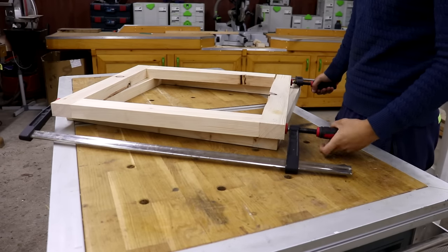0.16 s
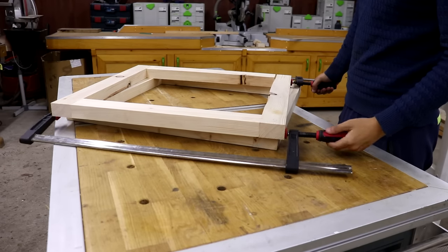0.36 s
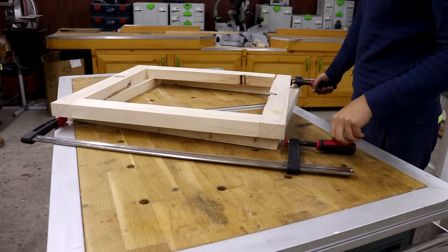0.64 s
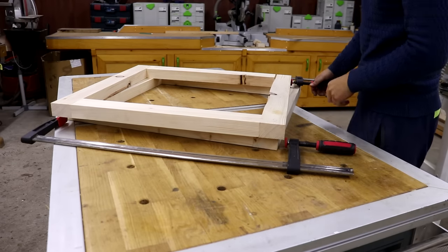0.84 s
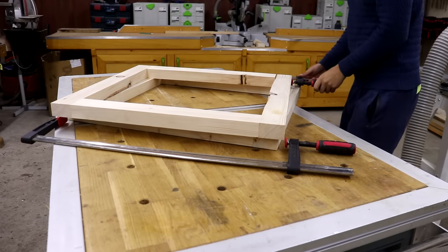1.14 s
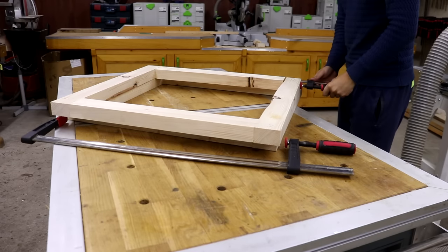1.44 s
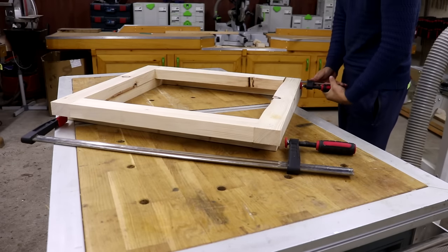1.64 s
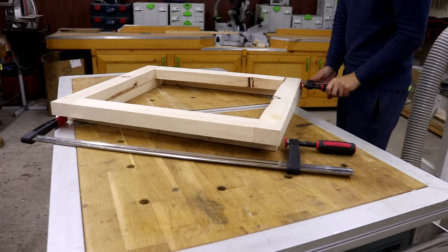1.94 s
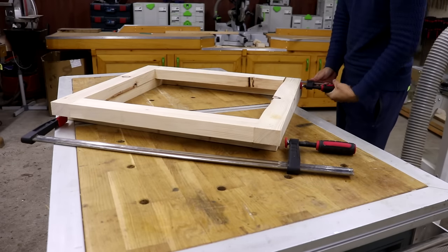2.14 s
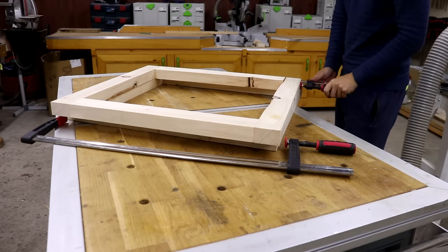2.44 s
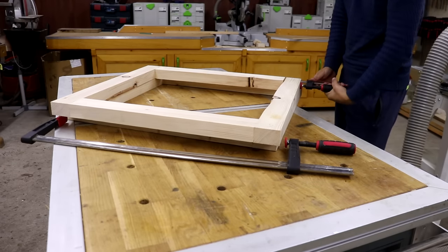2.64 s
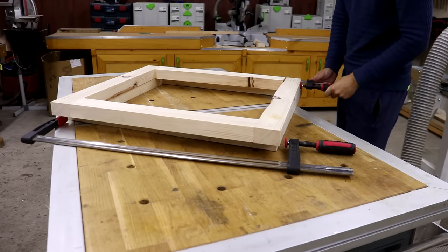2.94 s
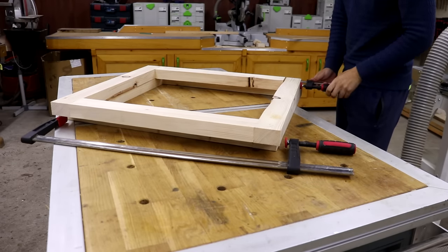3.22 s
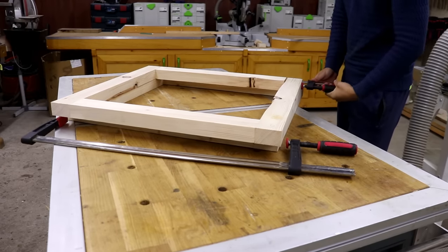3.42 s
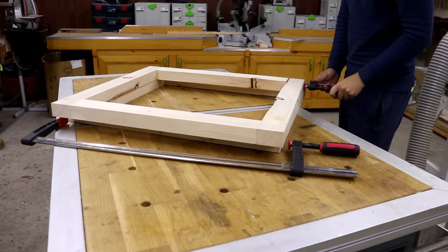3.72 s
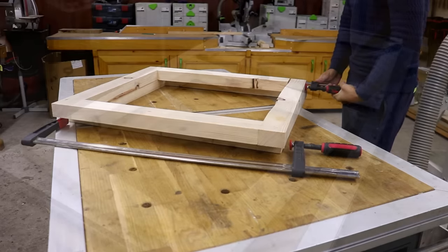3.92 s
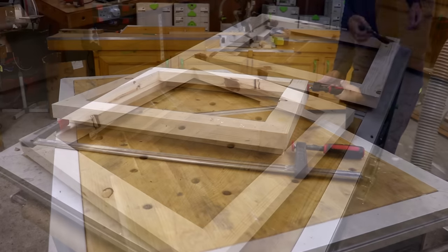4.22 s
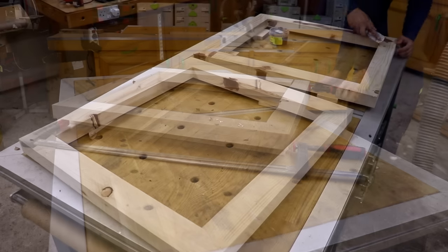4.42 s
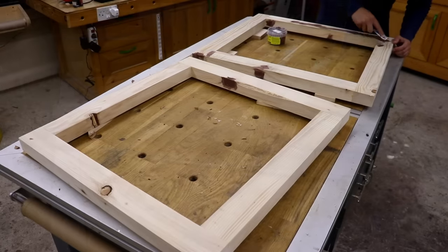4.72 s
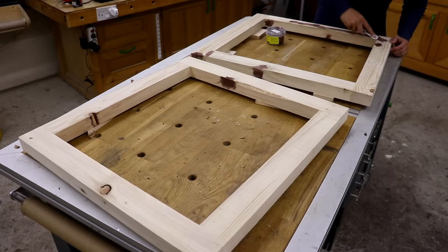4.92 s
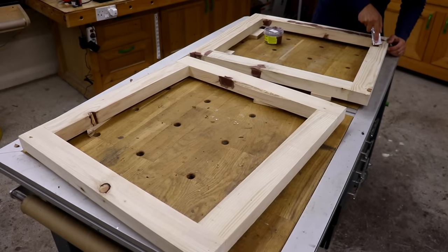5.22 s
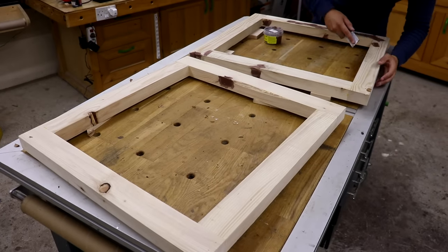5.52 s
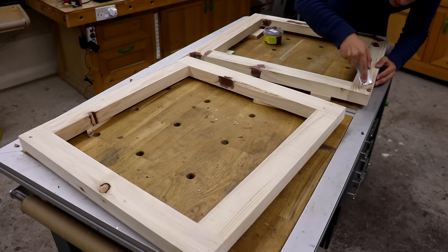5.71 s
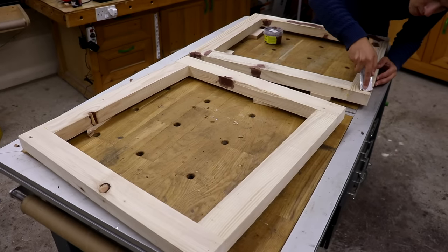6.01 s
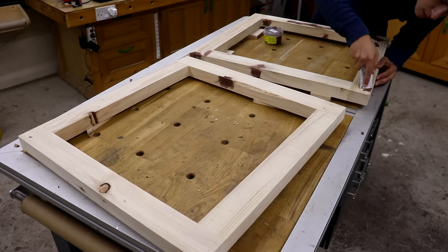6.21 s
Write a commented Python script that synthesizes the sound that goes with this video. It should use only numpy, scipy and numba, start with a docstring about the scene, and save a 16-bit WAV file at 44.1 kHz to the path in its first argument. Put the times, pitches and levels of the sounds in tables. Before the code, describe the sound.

Heavy metal clatter on a bench, six spaced knocks of a wooden frame as a clamp is screwed tight, then tiny scrapes and ticks on wood.

```python
"""A steel bar clamp lands on a workbench and rattles: noise cracks, ringing sine waves and a room tail.
Then a second clamp is screwed tight on a wooden frame. The frame knocks at every turn of the handle, as
damped sines and noise; hand, sleeve and screw rub in between, as streams of tiny slips.
At the end a small blade taps and scrapes on the wood. Hum, rumble and hiss lie under it all.
The close microphone overloads on the loud blows, and its gain control holds their ring level."""
import sys
import numpy as np
from scipy import signal
from scipy.fft import rfft, irfft, next_fast_len
from scipy.io import wavfile
from numba import njit

SR = 44100
rng = np.random.default_rng(int(sys.argv[2]) if len(sys.argv) > 2 else 0)


def to_wav(sig):
    """Store sig (one row per channel, or 1-D mono) as 16-bit WAV at the path in sys.argv[1].

    Samples outside -1..1 are clipped; the rate is SR.
    """
    pcm = np.clip(np.atleast_2d(sig), -1, 1) * 32767
    pcm = np.round(pcm).astype(np.int16)
    wavfile.write(sys.argv[1], SR, pcm.T)  # frames by channels


N = 280476
TIME = np.arange(N) / SR
RING = TIME[:SR * 4 // 5]   # clock of one single sound, 0.8 s long

# half turns of the screw, each a fresh grip and then a jerk of the frame:
# jerk t/s, jerk level/dB, grip t/s, grip length/s, grip level/dB, sleeve level/dB
TURNS = [(2.503, -19.5, 2.314, .04, -45, -69), (2.9436, -19, 2.752, 0.069, -45.5, -56.5),
         (3.3780, -17, 3.2, 0.057, -41.5, -63.5), (3.7872, -24, 3.598, .045, -47.5, -75),
         (4.205, -25, 4.056, 0.034, -44, -84), (4.579, -32, 4.4, 0.04, -52.5, -84)]
# light clicks of steel on steel or wood: t/s, level/dB, body level/dB, hiss level/dB
CLICKS = [(1.109, -53, -3, -57), (1.686, -48, -2.5, -63), (2.221, -45, -8, -47), (3.0703, -45, -6, -56.5),
          (3.904, -51.5, -12, -61), (4.219, -48.5, 7, -65), (5.201, -51.5, -13, -79),
          (5.434, -54, -27, -60.5), (5.7328, -62, 0, -76.5)]
# the blade is set down, then drawn over the wood:
# t/s, tap level/dB, body of the tap/dB, length of the draw/s, draw level/dB
BLADE_STROKES = [(4.678, -49.5, 1, .06, -70.5), (4.957, -55.5, -7.5, .05, -62.5),
                 (5.0816, -63, 1, .11, -65.5), (5.3045, -55, 6.5, 0.06, -58), (5.839, -60.5, 6, 0.11, -58),
                 (6.0463, -50.5, 5, 0.091, -55.5), (6.2417, -51, 2.5, .038, -49)]
# tone of a bright edge contact: f/Hz, level/dB
EDGE = [(1500, -6), (3300, 9.5), (6000, 9.5), (9000, 8), (12500, 9.5), (15500, -3.5)]
# tone of the body under a click or under the blade: f/Hz, level/dB
BLADE_BODY = [(200, -12.5), (400, 2.5), (850, 0), (1050, -3.5), (1280, -1.5), (1550, -2), (2100, 0.5),
              (2600, -9), (4300, -7), (7000, -16)]


def clamp(tail_db=-9, tail_hz=9000, bar_db=-12, tilt_db_per_octave=2.0, crack_t60=0.054, bar_t60=0.37,
          treble_hz=4000, lowest_hz=130):
    """Each blow is a crack, the ring of the bar and the answer of bench and room; steel on steel is brighter."""
    # tone of struck steel: f/Hz, level/dB
    steel = [(100, -35), (200, -6), (600, 0), (900, -7), (1080, -0.5), (1700, 2.5), (2550, -11),
             (3200, -18.5), (5300, -18), (8300, -22), (10000, -18), (11400, -20), (13000, -28.5),
             (16000, -29)]
    # ringing tones of the steel bar, before the tilt: f/Hz, level/dB
    bar_modes = [(1047, -48), (1319, -49), (1504, -48), (1640, -46), (1783, -45), (2225, -50), (2331, -50),
                 (2568, -51), (2627, -52), (3806, -60), (4700, -60), (5076, -60), (5561, -60), (5626, -60),
                 (5873, -59), (6142, -67), (6428, -63), (6740, -61), (7817, -61), (8818, -62), (9851, -64),
                 (10374, -64), (12312, -75), (14850, -78)]
    tilted = [(hz, db + tilt_db_per_octave * np.log2(hz)) for hz, db in bar_modes]
    out = np.zeros(N)
    for s, db, treble_db, ring_db in blows():
        crack = noise(steel) * dying(crack_t60)
        answer = from_db(tail_db) * soften(room_tail(noise(steel)), tail_hz)
        bar = from_db(bar_db + ring_db) * ringing(tilted, bar_t60, detune=.002)
        blow = crack + answer + bar
        dull = signal.lfilter(*signal.butter(1, treble_hz, fs=SR), blow)
        treble = blow - dull
        add(out, s, from_db(db) * (dull + from_db(treble_db) * treble))
    return low_cut(out, lowest_hz)


def blows(edge_lead_s=0.0018, edge_db=-2.5):
    """Every clank is a double contact, one edge just before the rest: (t/s, level/dB, treble/dB, ring/dB)."""
    # steel clamp striking the bench: t/s, level/dB, treble level/dB, ring of the bar/dB
    clanks = [(0.3839, 9, 1.5, -4), (0.6631, -10, 5, -8.5), (0.67, -3, 2.5, -3), (0.7286, -16, 9, -7.5),
              (1.3155, -8.5, -11, -17.5)]
    for s, db, treble_db, ring_db in clanks:
        yield s - edge_lead_s, db + edge_db, treble_db, ring_db
        yield s, db, treble_db, ring_db


def frame(tail_db=-9, modes_db=-6, grit_db=-7, grit_t60=0.059, wood_t60=0.27, lead_db=-9,
          bend_lag_s=0.001678, lowest_hz=165):
    """Every knock rings the same wood; a thin snap runs ahead of the slower bending wave."""
    # ringing tones of the clamped frame: f/Hz, level/dB
    frame_modes = [(214.5, -52), (306.8, -50), (398, -44), (452.2, -47), (511.4, -49), (619.1, -47),
                   (667.5, -51), (732.1, -47), (829.0, -53), (855.9, -54), (1157, -55), (1244, -56),
                   (1400, -56), (1443, -54), (1486, -56), (1545, -60), (1660, -57), (1733, -59),
                   (1820, -55), (1992, -64)]
    # tone of the noise in a knock and of its room tail: f/Hz, level/dB
    wood_tail = [(130, -12.5), (200, -1), (400, -3), (750, -4.5), (950, -7), (1800, -9), (2100, -17),
                 (3200, -25.5), (9000, -40.5)]
    out = np.zeros(N)
    for s, db, hard_hz in knocks():
        crack = wood_crack()
        grit = from_db(grit_db) * noise(wood_tail) * dying(grit_t60)
        modes = from_db(modes_db) * ringing(frame_modes, wood_t60)
        echo = from_db(tail_db) * room_tail(noise(wood_tail))
        add(out, s, from_db(db + lead_db) * soften(crack, hard_hz))
        add(out, s + bend_lag_s, from_db(db) * soften(crack + grit + modes + echo, hard_hz))
    return low_cut(out, lowest_hz)


def knocks(bounce_loss_db=5):
    """Single or bouncing knocks, and the play, slip and jerk of each turn: (t/s, level/dB, hardness/Hz)."""
    # knocks of frame, bench and blade, single or with dying bounces:
    # t/s, level/dB, hardness f/Hz, time between bounces/s, number of contacts
    plain_knocks = [(0.372, -27.5, 799, .04, 1), (.555, -19, 397, 0.056, 2), (0.6329, -20.5, 4000, 0.02, 2),
                    (0.763, -18.5, 3580, 0.032, 2), (1.181, -42, 1230, .04, 1), (1.316, -15, 3200, .034, 3),
                    (1.782, -31.5, 1530, .064, 2), (2.646, -38.5, 900, .1, 1), (2.68, -38, 1497, 0.092, 2),
                    (4.81, -52, 1006, 0.13, 2), (5.150, -52, 1100, .05, 1)]
    for s, db, hard_hz, gap, count in plain_knocks:
        for k in range(round(count)):
            yield s + k * gap, db - k * bounce_loss_db, hard_hz
    for s, db, grip_s, length, grip_db, _ in TURNS:
        force_db = db + 21   # strength against a -21 dB jerk
        # the handle takes up its play partway into the grip
        yield grip_s + 0.44 * length, grip_db - 0.5, 1950
        # the screw slips softly just before it gives
        yield s - .021, force_db - 40, 636
        # a stronger jerk is a harder contact: one octave brighter for every 17 dB
        yield s, db, 4350 * 2 ** (force_db / 17)


def wood_crack(spread_db=2.5):
    """The quickly damped resonances of wood, balanced a little differently by every contact."""
    # broad resonances of a knock: f/Hz, level/dB, time to fall by 60 dB/s
    resonances = [(482, -13, 0.033), (755, -5.5, 0.082), (1090, -4.5, 0.0049), (1554, 1, 0.013),
                  (1845, -6.5, 0.04), (2365, -11.5, 0.0084), (2870, -13, 0.013), (4520, -11, 0.0064)]
    chance_db = spread_db * rng.standard_normal(len(resonances))
    crack = np.zeros(len(RING))
    for k, (hz, db, t60) in enumerate(resonances):
        sign = (-1) ** k
        crack += sign * from_db(db + chance_db[k]) * np.sin(2 * np.pi * hz * RING) * dying(t60)
    return crack


def ticks(click_t60=0.012, tail_db=-9, tail_t60=0.44, note_db=-3, note_t60=0.13, lowest_hz=220):
    """A bright edge click over the short note of what it touches."""
    # ringing tones of lightly tapped wood: f/Hz, level/dB
    tap_modes = [(850.6, -69.5), (1276, -66.5), (1453, -81.5), (1863, -68), (2148, -69), (2842, -70),
                 (3763, -71.5), (4393, -71)]
    out = np.zeros(N)
    for s, db, body_db, *_ in CLICKS + BLADE_STROKES:
        contact = noise(EDGE) + from_db(body_db) * noise(BLADE_BODY)
        fade = dying(click_t60) + from_db(tail_db) * dying(tail_t60)
        note = from_db(body_db + note_db) * ringing(tap_modes, note_t60)
        add(out, s, from_db(db) * (contact * fade + note))
    return low_cut(out, lowest_hz)


def rubbing(wet_db=-2):
    """All sounds made of tiny slips, from screw, hand, sleeve and blade, with the room behind them."""
    close = skids_thump_and_creaks() + screw_grinding() + soft_brushing() + blade_drawing()
    room = room_tail(rng.standard_normal(len(RING)))
    wet = from_db(wet_db)
    return (close + wet * resound(close, room)) / np.hypot(1, wet)


def skids_thump_and_creaks(skirt_db=-15, creak_s=0.031, creak_db=-14.5, creak_hz=2520):
    """Sparse slips around one resonance: skids, one low thump, and a creak of the thread at each grip."""
    # skids, and one low thump of the frame at 1.18 s: t/s, length/s, level/dB, resonance f/Hz
    skids_and_thump = [(0.63, .02, -34, 1344), (.756, 0.032, -20, 1050), (1.18, 0.028, -33.5, 222),
                       (1.229, 0.085, -39, 1950), (1.264, 0.15, -29.5, 830), (5.588, 0.024, -57.5, 2620)]
    creaks = [(s, creak_s, db + creak_db, creak_hz) for _, _, s, _, db, _ in TURNS]
    out = np.zeros(N)
    for s, length, db, hz in skids_and_thump + creaks:
        add(out, s, from_db(db) * stroke(length, hump(hz, skirt_db), slips_per_s=1300, grain_db=2.0))
    return out


def screw_grinding(screw_db=-8.5, screw_t60=.035):
    """The thread grinds in tiny slips, and these make the screw ring."""
    # the screw spun loosely before it bites: t/s, length/s, level/dB
    spins = [(0.072, 0.14, -46.5), (0.308, 0.2, -40), (1.832, 0.054, -43.5), (2.376, 0.047, -46)]
    # tone of the grinding thread: f/Hz, level/dB
    grind_tone = [(150, -6), (260, 9.5), (450, -7), (1000, -4.5), (1700, -13), (2300, -10.5), (3000, -14),
                  (4000, -19.5), (7000, -20)]
    # ringing tones of the screw: f/Hz, level/dB
    screw_modes = [(969, -3), (1670, 1), (2560, 0), (2850, -1), (3630, -4.5), (4980, -6.5), (7100, -4.5)]
    grips = [(s, length, db) for _, _, s, length, db, _ in TURNS]
    out = np.zeros(N)
    for s, length, db in spins + grips:
        grind = from_db(db) * stroke(length, grind_tone, slips_per_s=2300, grain_db=1.5)
        ring = from_db(screw_db) * resound(grind, ringing(screw_modes, screw_t60))
        add(out, s, grind + ring)
    return out


def soft_brushing(skirt_db=-22):
    """A dense stream of slips makes soft brushing, one bright click, the sleeve and the hiss of each tick."""
    # soft brushing, and one short bright click at 0.54 s: t/s, length/s, level/dB, centre f/Hz
    brushes_and_click = [(0.011, 0.31, -59.5, 8300), (0.5406, 0.0052, -22.5, 6190),
                         (0.981, 0.052, -49, 5430), (1.095, 0.13, -54.5, 4590), (1.224, 0.11, -47, 8000),
                         (1.4, 0.27, -55, 8740)]
    # the sleeve follows the arm round, a little after the grip
    sleeves = [(s + 0.053, 0.24, db, 8160) for _, _, s, _, _, db in TURNS]
    # each light click glances off with a short hiss
    glances = [(s, 0.04, db, 8500) for s, _, _, db in CLICKS]
    out = np.zeros(N)
    for s, length, db, hz in brushes_and_click + sleeves + glances:
        add(out, s, from_db(db) * stroke(length, hump(hz, skirt_db), slips_per_s=15000, grain_db=1))
    return out


def blade_drawing(wait=0.25, full_s=0.096, db_per_doubling=11.5):
    """Long draws of the blade dig in and sound the wood, short ones mostly hiss."""
    out = np.zeros(N)
    for tap_s, _, _, length, db in BLADE_STROKES:
        s = tap_s + wait * length   # pause after the tap, as a share of the draw
        body_db = db_per_doubling * np.log2(length / full_s)
        hiss = stroke(length, EDGE, slips_per_s=8100, grain_db=0)
        body = stroke(length, BLADE_BODY, slips_per_s=3300, grain_db=3.5)
        add(out, s, from_db(db) * hiss)
        add(out, s, from_db(db + body_db) * body)
    return out


def shop(low_hum_hz=92, high_hum_hz=177, air_db=-66.5):
    """Faint steady hiss, fading rumble and a low hum that gives way to a higher one."""
    # the shop at rest: t/s, rumble level/dB, low hum level/dB, high hum level/dB
    levels = [(0, -58, -63.5, -76), (4.0, -61, -65, -75), (4.7, -69, -73, -70), (5.2, -75.5, -88, -73),
              (6.36, -86, -100, -71)]
    # tone of the rumble: f/Hz, level/dB
    rumble_tone = [(25, -3.5), (60, -5.5), (120, -1.5), (280, 1.5), (700, -7), (1700, -3.5), (4000, -21)]
    # tone of the hiss: f/Hz, level/dB
    air_tone = [(120, -36), (200, -6.5), (227, -29.5), (851, -10.5), (1420, -22), (3070, -9), (6760, -16),
                (12600, -19), (16000, -22)]
    s, *columns = np.transpose(levels)
    rumble, low, high = (from_db(np.interp(TIME, s, c)) for c in columns)
    hum = low * np.sin(2 * np.pi * low_hum_hz * TIME) + high * np.sin(2 * np.pi * high_hum_hz * TIME)
    hiss = from_db(air_db) * noise(air_tone, size=N)
    # the root of 2 makes the hum levels averages (rms) instead of peaks
    return np.sqrt(2) * hum + rumble * noise(rumble_tone, size=N) + hiss


def stroke(length, spectrum, slips_per_s, grain_db):
    """Friction: tiny slips of uneven size under a swell of pressure."""
    slips = (rng.random(len(RING)) < slips_per_s / SR) * rng.standard_normal(len(RING))
    sizes = from_db(abs(grain_db) * np.minimum(rng.exponential(1, len(RING)), 3))
    pressure = np.abs(np.sin(np.pi * np.minimum(RING / length, 1))) ** 0.87
    return colour(slips * sizes, spectrum) * pressure


def ringing(modes, t60, detune=0.):
    """Decaying sines, each with its own strength and sign; a changing contact can shift their pitch a little."""
    hz, db = np.transpose(modes)
    hz = hz * (1 + detune * rng.standard_normal(len(hz)))
    gain = from_db(db + 2 * rng.standard_normal(len(hz))) * rng.choice([-1, 1], len(hz))
    return rms_one(gain @ np.sin(2 * np.pi * hz[:, None] * RING)) * dying(t60)


def room_tail(x):
    """Diffuse sound builds up within milliseconds, then each octave dies at its own rate."""
    # how long the room rings: f/Hz, time to fall by 60 dB/s
    room_t60 = [(150, 0.44), (400, 0.34), (1200, 0.35), (3000, 0.36), (8000, 0.35), (15000, .27)]
    hz = np.arange(len(x) // 2 + 1) * SR / len(x)
    octave = np.round(np.log2(np.maximum(hz, 128)))
    bins = rfft(x)
    tail = np.zeros(len(x))
    for k in np.unique(octave):
        tail += irfft(bins * (octave == k), len(x)) * dying(at_hz(room_t60, 2 ** k))
    return tail * (1 - np.exp(-RING / 0.0042))


def resound(x, response):
    """Pass a sound through a ringing body or a room, scaled to unit energy."""
    return signal.fftconvolve(x, response / np.linalg.norm(response))[:len(x)]


def soften(x, hz):
    """A softer contact lasts longer and loses its treble."""
    return signal.sosfilt(signal.butter(2, min(hz, .45 * SR), fs=SR, output="sos"), x)


def low_cut(x, hz):
    """Bodies this small radiate little bass."""
    return signal.sosfilt(signal.butter(4, hz, "high", fs=SR, output="sos"), x)


def dying(t60):
    """A smooth fade that falls by 60 dB in t60 seconds."""
    return np.exp(-np.log(1000) * RING / max(t60, 1e-3))


def noise(spectrum, size=len(RING)):
    """Random noise with a given tone, rms 1."""
    return colour(rng.standard_normal(size), spectrum)


def colour(x, spectrum):
    """Shape a sound by a spectrum that falls away past both ends; rms 1."""
    size = next_fast_len(len(x))
    hz = np.arange(size // 2 + 1) * SR / size
    low_end = np.minimum(hz / spectrum[0][0], 1) ** 2
    high_end = np.minimum(spectrum[-1][0] / (hz + 1), 1) ** 2
    gain = from_db(at_hz(spectrum, hz)) * low_end * high_end
    return rms_one(irfft(rfft(x, size) * gain, size)[:len(x)])


def hump(hz, skirt_db):
    """A spectrum with one broad resonance, at skirt_db an octave to either side."""
    return [(hz / 2, skirt_db), (hz, 0), (hz * 2, skirt_db)]


def at_hz(points, hz):
    """Read a table on a log-frequency axis."""
    known, values = np.transpose(points)
    return np.interp(np.log(hz + 0.0011), np.log(known), values)   # the offset avoids log of 0


def from_db(db):
    """Turn decibels into a plain factor."""
    return 10 ** (np.asarray(db) / 20)


def rms_one(x):
    """Scale a sound to an average strength (rms) of 1."""
    return x / np.sqrt(np.mean(x ** 2) + 1e-20)


def add(out, s, sound):
    """Mix a sound in at a time in seconds."""
    start = max(round(s * SR), 0)
    out[start:start + len(sound)] += sound[:N - start]


@njit
def gain_control(x, limit, fall, rise):
    """The gain falls while the output is over the limit and creeps back otherwise (dB per sample)."""
    out, cut = np.empty_like(x), 0.
    for i in range(len(x)):
        out[i] = x[i] * 10 ** (-cut / 20)
        cut = cut + fall if abs(out[i]) > limit else max(cut - rise, 0.)
    return out


def scene():
    """All sources at one microphone."""
    return (clamp() + frame() + ticks() + rubbing() + shop())[None]


def record(dry, limit_db=-19, fall_db_per_s=3400, rise_db_per_s=150, cutoff_hz=15900):
    """Gain control comes too late for the hardest blows, which clip; the very top is cut."""
    held = gain_control(dry[0], from_db(limit_db), fall_db_per_s / SR, rise_db_per_s / SR)
    # the converter saturates before the gain has come down
    clipped = np.clip(held, -.3, .3)
    return signal.fftconvolve(clipped, signal.firwin(161, cutoff_hz, fs=SR), "same")[None]


dry = scene()
out = record(dry)
to_wav(out)
```